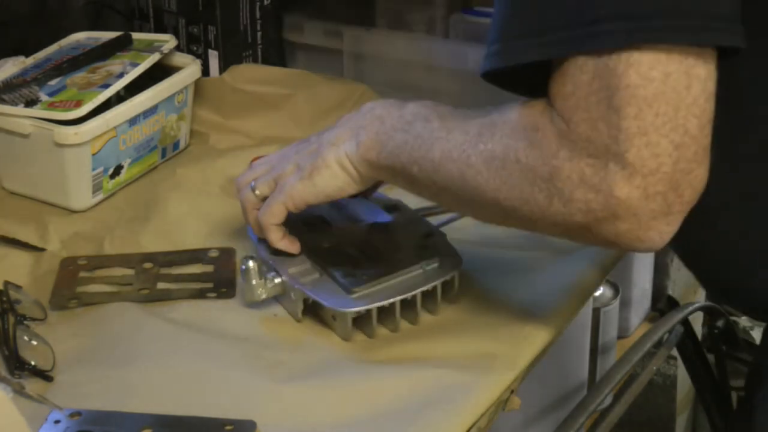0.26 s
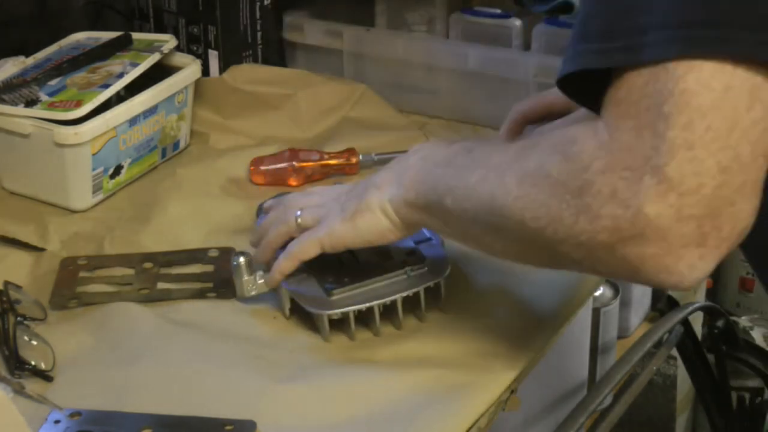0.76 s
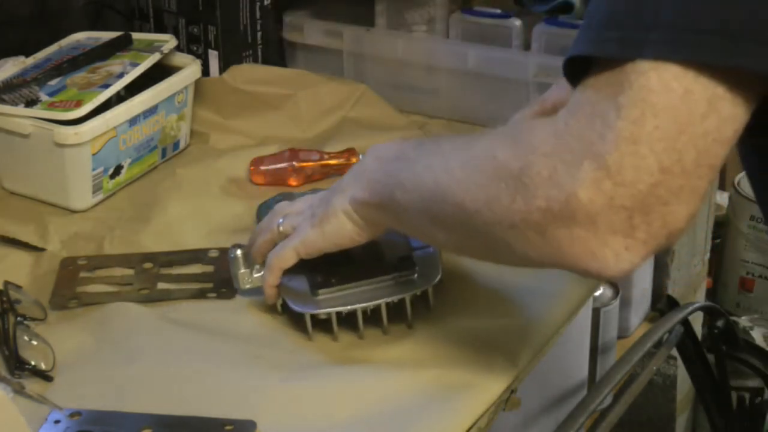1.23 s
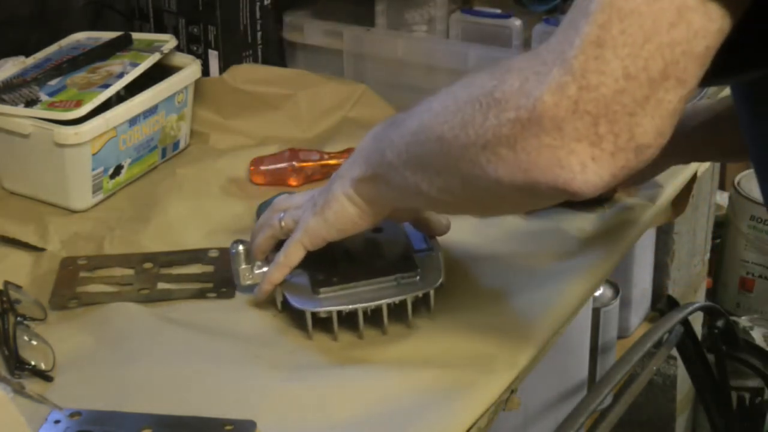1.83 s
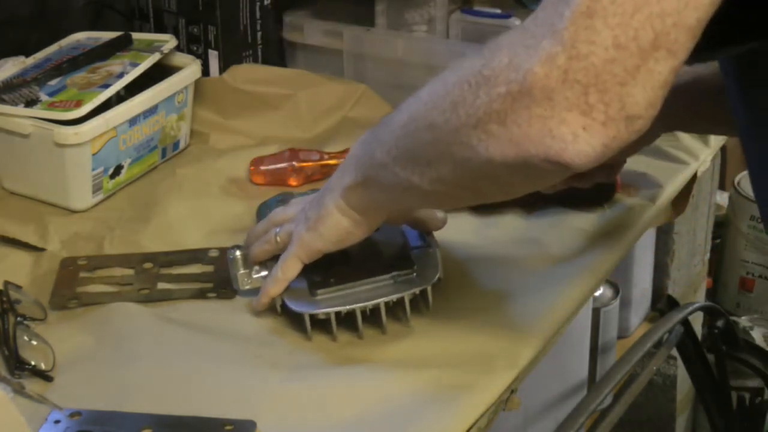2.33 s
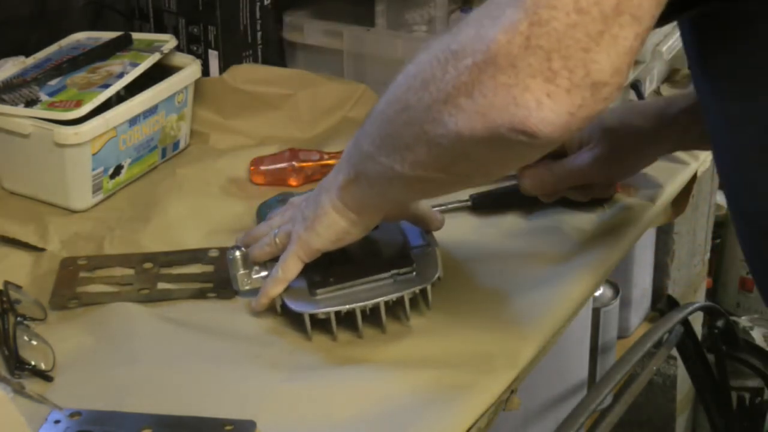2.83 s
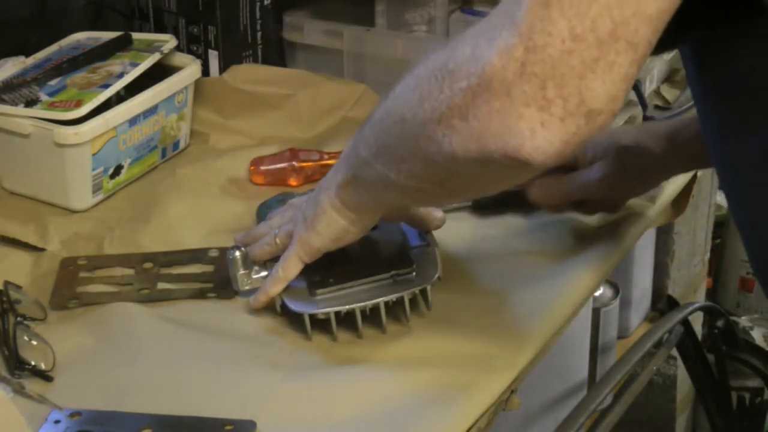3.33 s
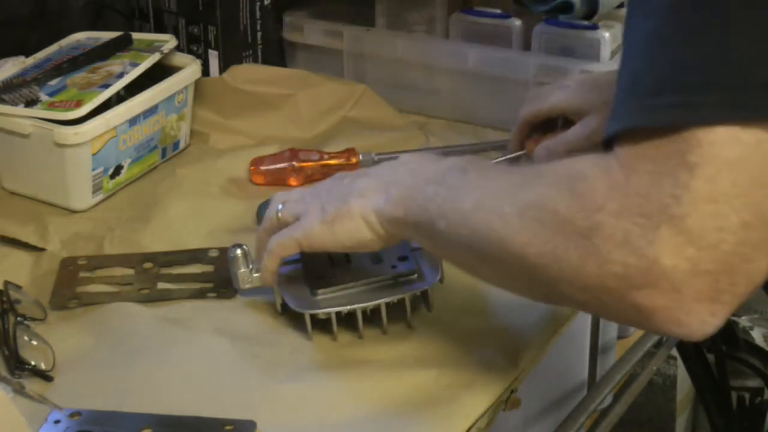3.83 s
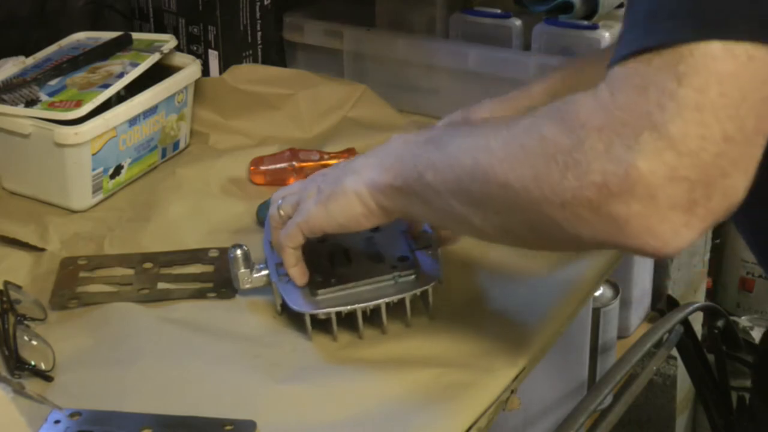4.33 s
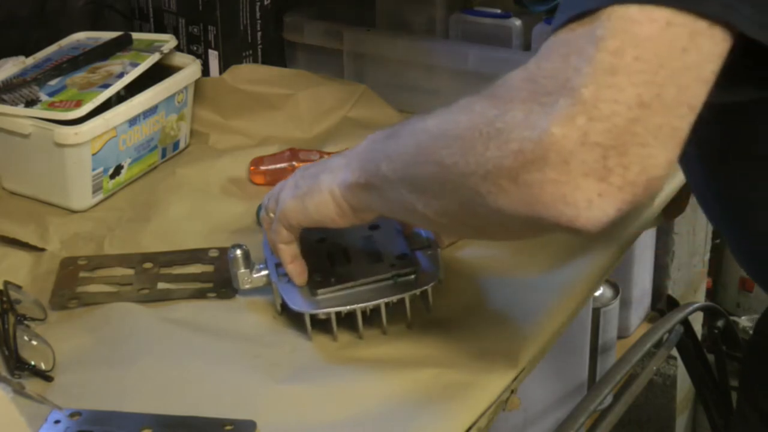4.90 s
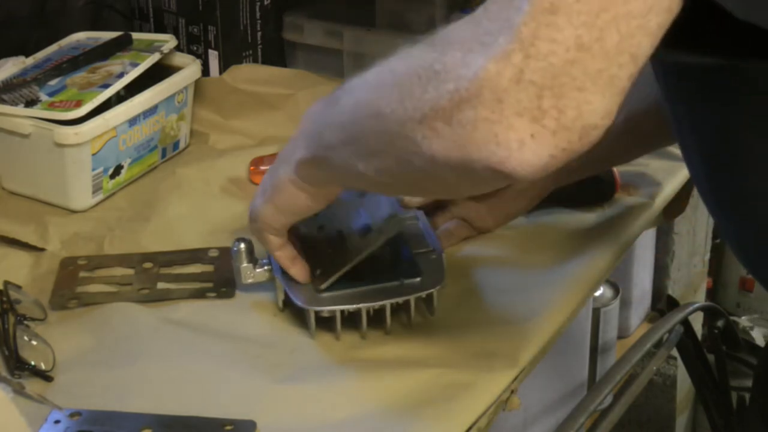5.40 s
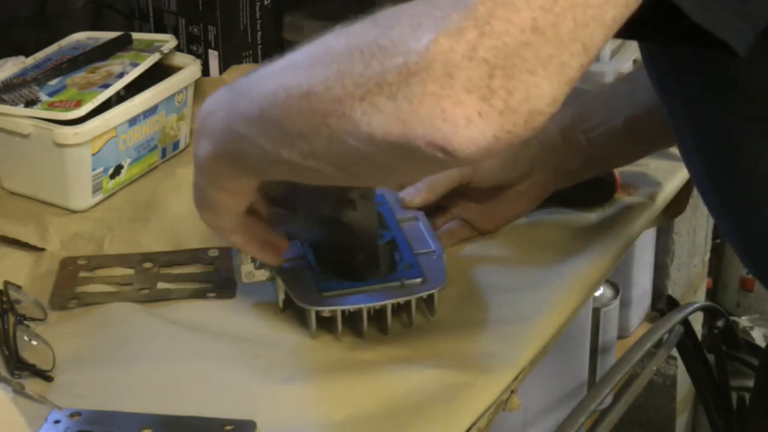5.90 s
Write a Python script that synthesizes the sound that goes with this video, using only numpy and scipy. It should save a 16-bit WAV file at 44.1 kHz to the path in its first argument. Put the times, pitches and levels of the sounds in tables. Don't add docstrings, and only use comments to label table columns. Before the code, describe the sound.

Close stereo sound in a small, dull-echoing workshop: busy rasping and bumping of cast metal on a bench, then a few small steel clinks and faint feeling ticks. A sudden loud metallic snap breaks the calm, followed by two weaker knocks, the last with a brief skid. Bright scratchy prying continues, ending with thin sheet-metal pings and soft bench bumps over low machine hum, high whine and hiss.

```python
import sys
import numpy as np
from scipy import signal
from scipy.fft import rfft, irfft
from scipy.io import wavfile

SR = 44100
rng = np.random.default_rng(int(sys.argv[2]) if len(sys.argv) > 2 else 0)


def to_wav(sig):
    pcm = np.clip(np.atleast_2d(sig), -1, 1) * 32767
    pcm = np.round(pcm).astype(np.int16)
    wavfile.write(sys.argv[1], SR, pcm.T)


def volts_from_db(level):
    exponent = np.asarray(level, float) / 20
    return 10 ** exponent


N = 271215
TIME = np.arange(N) / SR

# f/Hz, density/dB
AIR_SPECTRUM = [(15, -66), (25, -26), (92, 12.5), (223, -15), (293, -1), (695, 8), (796, 9.5), (887, -6),
                (1150, -0.5), (2410, 0), (10100, -23), (14800, -29), (16000, 1)]
# f/Hz, density/dB
AIR_SIDE_SPECTRUM = [(15, -60), (25, -53), (111, 3), (344, -1), (394, -0.5), (427, 2), (489, -7.5),
                     (840, -12.5), (911, -19.5), (14000, -33), (16000, -6.5)]
AIR_DB, AIR_SIDE_DB = -67.5, -54.5
HUM_HZ = [100, 301.5, 431, 866.5, 15627.3]
# centre level/dB, left-right difference level/dB, wander/Hz
HUM_LINES = [
    (-79, -84, 2.5),
    (-80.5, -70.5, 4.28),
    (-77, -67.5, 2.24),
    (-74.5, -80.5, 1.4),
    (-65, -88, .3),
]

# fastest t/s, rise/s, fall/s, rasp level/dB, edge above 7 kHz against the rasp/dB
STROKES = [(.07, 0.021, 0.17, -55.5, -1), (.29, 0.17, 0.14, -47.5, -5.5), (.58, 0.03, 0.13, -54, -12),
           (.76, 0.19, 0.47, -62, -7.5), (1.15, 0.081, 0.034, -47, -7.5), (1.24, 0.066, 0.049, -56, -14),
           (1.6, 0.16, 0.2, -70, -11), (3.24, 0.14, 0.18, -65.5, -10), (3.56, 0.062, 0.23, -70, -6),
           (3.92, 0.094, 0.12, -54.5, -7.5), (4.2, 0.4, 0.34, -61, -1.5), (4.62, 0.068, 0.13, -53, -9.5),
           (5.26, 0.043, 0.061, -52.5, -7), (5.8, 0.18, 0.093, -65, -4), (6.04, 0.022, 0.05, -65, -7)]
# heaviest t/s, rise/s, fall/s, bench rumble level/dB, hollow
# 450-820 Hz against the rumble/dB
LEANS = [
    (0.0, .1, 0.064, -59.5, -14),
    (.36, 0.33, 0.65, -63.5, 1.5),
    (1.12, 0.082, 0.097, -55.5, 13.5),
    (3.25, 0.11, 0.11, -62, 3),
    (3.8, 0.047, 0.29, -64.5, 10.5),
    (4.03, 0.065, 0.36, -64, -2),
    (4.6, 0.22, 0.22, -66.5, 12.5),
    (5.85, 0.14, 0.54, -64, -18),
]
IDLE_RASP_DB, IDLE_EDGE_DB, IDLE_BENCH_DB, IDLE_HOLLOW_DB = -72.5, -76, -69.5, -75.5
BELL_SHAPE = 1.82
# f/Hz, density/dB
RASP = [(590, -77), (1000, -9.5), (1270, -25), (1430, 0), (1600, -16), (1750, 0.5), (2670, 1), (6350, 1),
        (9000, -22.5), (11700, -53), (19800, -120)]

# start t/s, end t/s, first f/Hz, last f/Hz, level/dB, half width/Hz
RUBS = [(1.68, 1.95, 1850, 1880, -71.5, 12), (3.03, 3.115, 2310, 2120, -71, 44),
        (5.44, 5.553, 3500, 1900, -78, 30), (0.916, 0.975, 2380, 2130, -59.5, 90),
        (0.0, 0.036, 2900, 2200, -60, 200), (0.071, 0.13, 4500, 4100, -56, 200),
        (0.135, 0.18, 3950, 3400, -55, 230), (0.188, 0.26, 3900, 3900, -52, 250),
        (0.265, 0.34, 4300, 4900, -54, 250), (1.11, 1.167, 3500, 4200, -55, 200),
        (2.36, 2.42, 3900, 3850, -76, 30), (0.57, 0.61, 1700, 1500, -54.5, 250)]
STEADY_HZ = 15

# t/s, peak
# level/dB, centre f/Hz, share above 7 kHz/dB
CONTACTS = [(0.038, -39, 2490, -14), (0.0525, -47, 4400, -9), (0.459, -35, 3080, -32),
            (1.341, -45.5, 1730, -33), (1.364, -50, 1750, -35), (1.498, -49, 2456, -25),
            (0.0475, -27.5, 4430, -6.5), (0.2483, -38.5, 1780, -14), (0.4635, -32, 3900, -25),
            (0.6843, -44, 1970, -6), (0.7506, -43.5, 2410, -19), (0.7925, -41.5, 1840, -25),
            (0.942, -46.5, 2380, -4), (1.023, -31.5, 2800, -30), (1.096, -34.5, 1780, -15),
            (1.104, -40, 2400, -22), (1.1543, -35, 2700, -2.5), (1.2204, -38, 3140, -18),
            (1.278, -55, 6340, 13.5), (1.3074, -42.5, 3290, -0.5), (1.3166, -40, 4540, -18),
            (1.4571, -47, 2200, -23),
            (1.624, -44, 1060, -30), (3.225, -48, 3200, -25), (1.5834, -44.5, 4530, -21),
          (1.6154, -50, 2670, -28), (1.849, -45.5, 2220, -22), (1.8951, -45.5, 3370, -11),
          (1.9217, -48.5, 5470, -7), (2.231, -44, 2930, -40), (2.299, -44, 1900, -20),
          (2.316, -43, 2920, -25), (3.2964, -43, 2570, -12), (3.3534, -46.5, 3000, -9),
          (3.6298, -47, 2310, -30), (3.8192, -43, 2730, -19), (3.8857, -42, 5500, -18),
            (4.2817, -48, 2340, -14), (4.380, -46, 4000, -17), (4.496, -41, 2120, -14),
           (4.711, -40, 680, -35), (5.893, -40, 850, -42), (6.068, -56, 1400, -35), (6.078, -39, 2900, -28),
           (4.3327, -35.5, 4600, -21), (4.4387, -37.5, 2510, -7.5), (4.563, -28.5, 5310, -10.5),
           (4.5897, -30.5, 6160, -25), (4.64, -34.5, 3970, -7), (4.6617, -42, 4510, 1),
           (4.6937, -36.5, 4930, -3), (4.724, -36, 3020, -6.5), (4.9803, -35, 3400, -7),
           (5.0984, -44.5, 2590, -19), (5.237, -38, 2500, -29), (5.2628, -33, 2680, -14),
           (5.2661, -31, 3080, -13), (5.652, -40, 2240, -34), (5.7616, -40, 2100, -7),
           (5.888, -45, 2300, -20), (6.0626, -41, 2160, -44), (6.1464, -31, 4500, 4.5)]
# t/s, peak level/dB, centre f/Hz, share above 7 kHz/dB
SCUFFS = [(0.343, -30.5, 3420, -8.5), (0.5628, -36.5, 2140, -30), (0.6193, -43, 3070, 7),
          (0.945, -45.5, 3720, -20), (1.013, -42, 3500, -10), (2.003, -52.5, 3800, -8),
          (2.055, -51.5, 2600, -25), (2.081, -55, 2430, -25), (2.135, -72, 2320, -25),
          (2.271, -53, 4960, -2), (4.815, -54, 3800, -2), (4.905, -49.5, 5700, -8),
          (5.156, -41.5, 3730, -27), (5.217, -48, 3280, -13), (5.395, -55.5, 6500, 6),
          (5.428, -45, 2500, -5.5), (5.45, -53, 5000, -1), (5.52, -57.5, 4500, 3)]
TICK_T60_S, TICK_RISE_S, SCUFF_RISE_S, TICK_SNAP_DB = 0.086, 0.0016, 0.0077, 6.5

# t/s, peak level/dB, f/Hz
SNAPS = [(0.0489, -33, 4200), (0.0533, -34, 4460), (0.0595, -36, 5500), (0.251, -34, 3540),
         (0.268, -36, 4400), (0.293, -37, 3300), (0.3505, -36, 2900), (0.4647, -33, 4500),
         (0.6205, -48.5, 8950), (1.2204, -38, 3500), (1.3173, -39, 5000), (1.6177, -39, 2840),
         (1.6228, -42, 2210), (2.8063, -15, 2650), (2.8066, -14, 3400), (2.8068, -17, 5000),
         (2.8069, -21, 1300), (3.16, -29, 2600), (3.9595, -31, 6100), (3.9655, -24, 5900),
         (3.9687, -20, 4600), (3.9715, -16, 4350), (3.974, -24, 2600), (4.282, -43, 2520),
         (4.437, -45, 2970), (4.5639, -32, 6100), (4.6922, -34, 5000), (4.7235, -38, 4060),
         (4.9797, -36, 7500), (5.2658, -32, 3500), (6.0685, -28, 2300), (6.0775, -36, 3000)]
SNAP_CYCLES = 4.0

# t/s, peak level/dB, f/Hz
THUMPS = [(0.137, -46, 182), (0.218, -34.5, 202), (0.377, -42, 179), (0.537, -47, 230), (0.643, -43.5, 170),
          (0.689, -42, 210), (0.83, -42, 201), (0.937, -38.5, 194.5), (1.03, -41, 213),
          (1.168, -39.5, 165.5), (1.409, -55, 273), (2.298, -57, 299), (2.91, -53, 371), (2.81, -43, 200),
          (3.163, -38, 290), (3.248, -52, 440), (3.764, -49, 219), (3.833, -48, 219), (3.968, -34, 281.5),
          (4.387, -53, 187), (4.55, -49, 238), (4.707, -52, 385), (5.269, -53.5, 209), (5.592, -57, 222),
          (5.77, -46.5, 233), (5.896, -34.5, 222.2), (6.073, -38.5, 212)]
BENCH_T60_S = 0.12
THUD_DB, THUD_DB_PER_OCTAVE = -14, 12

# t/s, contact/s
CLINKS = [
    (1.022, 0.0022),
    (1.056, 0.0031),
    (1.092, 0.0032),
    (1.221, 0.0028),
    (1.617, 0.0019),
    (1.7075, 0.0023),
]
SHAFT_HZ = [1460, 1860, 2275, 2720, 2870, 2993, 3030, 4640, 4985, 5986, 4715, 5780]
# t60/s, then level/dB at each clink
SHAFT_MODES = [(0.057, -66, -80, -52, -49.5, -61, -49), (0.13, -44.5, -85, -70, -68, -58, -57),
               (0.1, -46, -68, -44, -65, -83, -84), (0.11, -43.5, -60, -70, -63, -78, -58),
               (0.065, -36, -54, -70, -70, -74, -68), (0.1, -39.5, -38.5, -70, -70, -80, -53),
               (0.062, -39, -53, -70, -70, -73, -38), (0.04, -62, -70, -70, -70, -80, -46),
               (0.057, -45, -64, -70, -70, -82, -55), (0.038, -55, -62, -70, -70, -83, -54),
               (0.1, -65, -70, -70, -70, -78, -57), (0.053, -65, -70, -70, -70, -80, -58)]

# t/s, snap level/dB, snap length/s, crack level/dB, crack t60/s, skid/s
KNOCKS = [
    (2.8074, -9, 0.00037, -26, 0.12, 0.0003),
    (3.1546, -32, 0.0025, -34, 0.14, 0.00056),
    (3.97, -28, 0.0043, -28, 0.16, 0.0078),
]
# f/Hz, density/dB
FIRST_CRACK = [(180, -7), (300, 1), (1000, -8.5), (1500, -30), (2700, -7.5), (5430, -10.5), (5800, -9.5),
               (16000, -25.5)]
SECOND_CRACK = [(150, -16), (300, -3.5), (379, -33), (737, -3.5), (1190, -24.5), (2700, -20.5), (3400, -15),
                (16000, -50)]
THIRD_CRACK = [(180, -5.5), (300, -0.5), (713, -9), (1100, -14.5), (1500, -14), (2600, -12.5), (4520, -9.5),
               (16000, -22)]
CRACKS = [FIRST_CRACK, SECOND_CRACK, THIRD_CRACK]
# t/s, contact/s
HEAD_BLOWS = [
    (2.8058, 0.00057),
    (2.8145, 0.0012),
    (3.1545, 0.0023),
    (3.966, 0.0028),
]
HEAD_HZ = [455, 605, 735, 791, 1042, 1860, 2600, 2730, 3025, 3400, 4170, 4670, 5700, 5910, 255, 3800, 4930,
           5440, 6510]
# t60/s, then level/dB at each blow
HEAD_MODES = [(0.41, -74, -54, -47.5, -47), (0.057, -36, -50, -48, -48), (0.086, -22.5, -32.5, -28.5, -30),
              (0.15, -37, -39, -50, -43), (0.04, -32, -62, -34, -36.5), (0.068, -37, -47, -40.5, -29.5),
              (0.023, -44, -57, -27.5, -20), (0.047, -41, -33, -36, -40), (0.04, -56, -44, -33.5, -37),
              (0.017, -34, -49, -53, -62), (0.04, -30, -54, -38, -30), (0.047, -25, -35, -39, -27),
              (0.091, -60, -27, -46, -31), (0.041, -45, -43, -62, -28), (0.23, -47, -55, -48, -55),
              (0.076, -45, -49, -44, -49), (0.091, -42, -48, -48, -42), (0.066, -34, -46, -48, -39),
              (0.081, -43, -48, -60, -34)]
BOUNCE_S, BOUNCE_CONTACT_S, BOUNCE_LOSS_DB = 3.232, 0.002, 18
BOUNCE_FIN_HZ, BOUNCE_FIN_GAIN_DB = 1900, 6

# t/s, contact/s
TOUCHES = [
    (5.7615, 0.0011),
    (5.826, 0.0013),
    (5.890, 0.0025),
    (6.0645, 0.0022),
    (6.1463, 0.00082),
]
PLATE_HZ = [430, 600, 810, 1036, 1445, 1950, 2040, 2205, 2993, 4140, 4520, 5530, 5930, 6043, 6770, 6920,
            8133, 8730, 10820, 301, 960, 1100, 1600, 1820, 2320, 3047, 3505, 1710, 2466, 2869, 3990]
# t60/s, then level/dB at each touch
PLATE_MODES = [(0.13, -64, -85, -44, -44.5, -67), (0.048, -61, -83, -40, -48.5, -63),
               (0.038, -47.5, -81, -51, -48, -68), (0.067, -62, -80, -43, -42, -75),
               (0.045, -68, -80, -44.5, -41, -68), (0.17, -75, -67, -47, -37.5, -52),
               (0.033, -72, -75, -56, -30.5, -50), (0.36, -62, -75, -56, -62, -64),
               (0.085, -69, -72, -62, -44.5, -52), (0.077, -58, -70, -58, -50, -50),
               (0.096, -55, -59, -54.5, -59, -57), (0.14, -70, -60, -75, -53, -53),
               (0.27, -57.5, -67, -53.5, -61, -45), (0.05, -75, -80, -72, -43, -50),
               (0.14, -52, -79, -56, -60, -38), (0.15, -53, -80, -72, -54, -51),
               (0.25, -54, -74, -70, -56, -39), (0.17, -64, -80, -63, -77, -55),
               (0.17, -61, -82, -65, -68, -59), (0.16, -52, -76, -39.5, -47, -70),
               (0.045, -58, -82, -68, -70, -70), (0.084, -76, -80, -69, -69, -70),
               (0.067, -70, -78, -48, -60, -70), (0.036, -66, -80, -39, -49, -65),
               (0.055, -70, -75, -66, -44, -63), (0.082, -70, -75, -56, -43, -55),
               (0.2, -72, -84, -81, -70, -51), (0.045, -75, -80, -74, -41.5, -65),
               (0.063, -75, -80, -70, -51, -63), (.2, -75, -82, -75, -57, -48),
               (.05, -75, -80, -75, -65, -37.5)]
HEAD_BEAT_DB, SHAFT_BEAT_DB, PLATE_BEAT_DB = 1.5, 2.5, 1.5

ROOM_T60_S, ROOM_DB, WALL_CUT_HZ = 0.27, -12, 6500
RING_ECHO_DB = -5
TOP_HZ = 17100


def rms_one(x):
    return x / np.sqrt(np.mean(x ** 2) + 1e-20)


def fade(t, t60):
    return volts_from_db(-60 * t / max(t60, .005))


def coloured(x, spectrum):
    hz, db = np.transpose(spectrum)
    axis = np.maximum(np.fft.rfftfreq(x.shape[-1], 1 / SR), 1)
    gain = volts_from_db(np.interp(np.log(axis), np.log(hz), db))
    return rms_one(irfft(rfft(x) * gain, x.shape[-1]))


def passed(x, hz, kind, order=2):
    sos = signal.butter(order, np.clip(hz, 10, .45 * SR), kind, fs=SR, output="sos")
    return signal.sosfilt(sos, x)


def band_noise(x, low_hz, high_hz, order=2):
    return rms_one(passed(x, [low_hz, high_hz], "band", order))


def drift(rate_hz):
    return rms_one(passed(rng.standard_normal(N + SR), rate_hz, "low")[SR:])


def ring(force, hz, t60):
    r, w = fade(1 / SR, t60), 2 * np.pi * hz / SR
    return signal.lfilter([0, np.sin(w)], [1, -2 * r * np.cos(w), r * r], force + 1e-18)


def add(out, s, piece):
    at = round(s * SR)
    out[at:at + len(piece)] += piece[:N - at]


def grit(per_s, spread_db):
    sizes = volts_from_db(spread_db * np.minimum(rng.exponential(1, N), 4))
    sizes = sizes * rng.choice([-1, 1], N)
    return rms_one(sizes * (rng.random(N) < per_s / SR))


def swells(rows, idle_db, idle_other_db):
    t = TIME[::64]
    main, other = volts_from_db(2 * idle_db), volts_from_db(2 * idle_other_db)
    for s, rise, fall, db, other_db in rows:
        distance = np.abs((t - s) / np.where(t < s, rise, fall))
        power = volts_from_db(2 * db) * np.exp(-2 * distance ** BELL_SHAPE)
        main = main + power
        other = other + power * volts_from_db(2 * other_db)
    return np.interp(TIME, t, 10 * np.log10(main)), np.interp(TIME, t, 10 * np.log10(other))


def struck(blows, pitches, modes, beat_db):
    out, t = np.zeros(N), TIME[:2000]
    waver = drift(130)
    roughness = np.abs(rng.standard_normal((len(pitches), len(blows), len(t))))
    for hz, (t60, *levels_db), rough_pushes in zip(pitches, modes, roughness):
        force = np.zeros(N)
        for (s, contact_s), db, rough in zip(blows, levels_db, rough_pushes):
            push = rough * np.exp(-t / max(contact_s, .0002))
            felt = 2 * push / push.sum() * np.cos(2 * np.pi * hz * t)
            add(force, s, felt * volts_from_db(db))
        beating = volts_from_db(beat_db * np.roll(waver, 97 * round(hz)))
        out += ring(force, hz, t60) * beating
    return out


def background():
    mid = volts_from_db(AIR_DB + .5 * drift(3)) * coloured(rng.standard_normal(N), AIR_SPECTRUM)
    side = volts_from_db(AIR_SIDE_DB) * coloured(rng.standard_normal(N), AIR_SIDE_SPECTRUM)
    for hz, (mid_db, side_db, wander_hz) in zip(HUM_HZ, HUM_LINES):
        phase = 2 * np.pi * np.cumsum(hz + wander_hz * drift(5.5)) / SR
        sway_db = 2.0 * min(wander_hz, 1) * drift(7.4)
        mid = mid + np.sqrt(2) * volts_from_db(mid_db + sway_db) * np.sin(phase)
        side = side + np.sqrt(2) * volts_from_db(side_db) * np.cos(phase)
    return mid, side


def drag():
    rasp_db, edge_db = swells(STROKES, IDLE_RASP_DB, IDLE_EDGE_DB)
    bench_db, hollow_db = swells(LEANS, IDLE_BENCH_DB, IDLE_HOLLOW_DB)
    stutter_db = 2.0 * drift(27.0)
    grains = grit(3000, spread_db=1.5)
    grip_db = 5.0 * drift(20.0)
    fins = np.zeros(N)
    for hz in HEAD_HZ:
        if hz > 2500:
            fins += ring(grains, hz, t60=0.013) * volts_from_db(np.roll(grip_db, 61 * round(hz)))
    rasp = volts_from_db(rasp_db + stutter_db) * (coloured(grains, RASP) + volts_from_db(-10) * rms_one(fins))
    bright = passed(passed(grains, [7000, 15500], "band"), 8100, "low", order=1)
    edge = volts_from_db(edge_db + 0.067 * stutter_db + 0.2 * drift(51)) * rms_one(bright)
    hollow = volts_from_db(hollow_db - 14.0 + stutter_db) * band_noise(rng.standard_normal(N), 450, 820)
    bench = band_noise(rng.standard_normal(N), 140, 380)
    legs = volts_from_db(-18.0) * band_noise(rng.standard_normal(N), 30, 80)
    rumble = volts_from_db(bench_db + 3.2 * drift(19.0)) * (bench + legs)
    return rasp + edge + hollow, rumble


def rubs():
    out, white = np.zeros(N), rng.standard_normal(N + SR)
    for start, end, first_hz, last_hz, db, width_hz in RUBS:
        t, at = TIME[:round((end - start) * SR)], round(start * SR)
        both = np.array([white[at:], white[::-1][at:]])[:, :len(t) + SR // 4]
        even, odd = rms_one(passed(both, width_hz, "low")[:, SR // 4:])
        phase = 2 * np.pi * np.cumsum(np.linspace(first_hz, last_hz, len(t))) / SR
        song = (even + STEADY_HZ / width_hz) * np.cos(phase) + odd * np.sin(phase)
        add(out, start, volts_from_db(db) * np.sqrt(np.sin(np.pi * t / (end - start))) * song)
    return out


def ticks():
    out, t = np.zeros(N), TIME[:6000]
    hard = CONTACTS
    rows = hard + SCUFFS
    whites = rng.standard_normal((len(rows), 2, len(t)))
    dying = fade(t, TICK_T60_S)
    for k, ((s, db, hz, top_db), white) in enumerate(zip(rows, whites)):
        if k < len(hard):
            snap = volts_from_db(top_db / 5 + TICK_SNAP_DB) * np.exp(-t / 0.00072)
            shape = dying * (1 - np.exp(-t / TICK_RISE_S)) + snap
        else:
            shape = 2 * dying * (1 - np.exp(-t / SCUFF_RISE_S))
        broad = band_noise(white[0], 1500, 7000)
        body = band_noise(white[0], hz / 1.264, hz * 1.153, order=1)
        reach_hz = np.clip(12500 + 300 * top_db, 8000, 15500)
        top = volts_from_db(top_db) * fade(t, 2 * TICK_T60_S) * band_noise(white[1], 6500, reach_hz)
        add(out, s - .0005, volts_from_db(db - 10.0) * shape * (0.33 * broad + 0.79 * body + top))
    return out


def snaps():
    out, click = np.zeros(N), np.eye(1, 400)[0]
    for s, db, hz in SNAPS:
        add(out, s, volts_from_db(db - 0.5) * ring(click, hz, SNAP_CYCLES / hz))
    return out


def thumps():
    out, t = np.zeros(N), TIME[:12000]
    for (s, db, hz), white in zip(THUMPS, rng.standard_normal((len(THUMPS), len(t)))):
        shape = fade(t, BENCH_T60_S) * (1 - np.exp(-t / 0.0058)) ** 2
        turn = 2 * np.pi * hz * t
        tone = np.sin(turn) + 0.34 * np.sin(1.43 * turn) + 0.7 * np.sin(0.724 * turn)
        thud = rms_one(passed(passed(white, [110, 1500], "band"), 80, "low", order=1))
        thud *= volts_from_db(THUD_DB + THUD_DB_PER_OCTAVE * np.log2(hz / 200))
        thud *= fade(t, 1.75 * BENCH_T60_S) * (1 - np.exp(-t / 0.007))
        add(out, s - .004, volts_from_db(db + 2.5) * (shape * tone + thud))
    return out


def shaft():
    return struck(CLINKS, SHAFT_HZ, SHAFT_MODES, SHAFT_BEAT_DB)


def knocks():
    lead = .04
    out, t = np.zeros(N), TIME[:16000] - lead
    after = np.maximum(t, 0)
    whites = rng.standard_normal((len(KNOCKS), len(t)))
    for (s, db, length, crack_db, t60, skid_s), white, crack in zip(KNOCKS, whites, CRACKS):
        noise = coloured(white, crack)
        snap = volts_from_db(db - 0.5) * np.exp(-(after / length) ** 2)
        snap = snap * passed(noise, 1180, "high")
        tail = volts_from_db(crack_db) * fade(after, t60) * noise
        add(out, s - lead, np.exp(np.minimum(t, 0) / skid_s) * (snap + tail))
    modes = []
    for hz, row in zip(HEAD_HZ, HEAD_MODES):
        fin_db = BOUNCE_FIN_GAIN_DB * np.exp(-np.log2(hz / BOUNCE_FIN_HZ) ** 2)
        modes.append((*row, row[-2] - BOUNCE_LOSS_DB + fin_db))
    blows = HEAD_BLOWS + [(BOUNCE_S, BOUNCE_CONTACT_S)]
    return out, struck(blows, HEAD_HZ, modes, HEAD_BEAT_DB)


def plate():
    return struck(TOUCHES, PLATE_HZ, PLATE_MODES, PLATE_BEAT_DB)


def workshop(x):
    t = TIME[:SR // 2]
    tails = passed(rng.standard_normal((2, len(t))), WALL_CUT_HZ, "low", order=1)
    tails = tails * fade(t, ROOM_T60_S) * (t > .003)
    tails /= np.sqrt(np.sum(tails ** 2, axis=1, keepdims=True))
    return volts_from_db(ROOM_DB) * signal.fftconvolve(x[None], tails, axes=1)[:, :N]


def scene():
    cracks, rings = passed(np.array(knocks()), 167, "high")
    blows = cracks + rings
    rasp, rumble = drag()
    metal = rasp + ticks() + snaps() + blows + shaft() + plate() + rubs()
    bench = rumble + passed(thumps(), 103, "high", order=3)
    echo_mid, echo_side = workshop(metal + bench - (1 - volts_from_db(RING_ECHO_DB)) * rings)
    air_mid, air_side = background()
    wide = volts_from_db(2.5) * passed(passed(echo_side, 1560, "low", order=1), 250, "high", order=1)
    late = np.roll(passed(metal, 11600, "high"), SR // 2000)
    leaning = volts_from_db(-15.5) * passed(metal, 1500, "low", order=1) + volts_from_db(-6.0) * late
    jolt = volts_from_db(5.0) * passed(blows ** 2, 260, "low", order=1)
    mid = metal + bench + echo_mid + air_mid
    side = wide + leaning + jolt + air_side
    return np.array([mid + side, mid - side])


def band_limit(x):
    return signal.sosfilt(signal.butter(12, 17130, fs=SR, output="sos"), x)


def record(dry):
    top_cut = signal.cheby2(10, 60, TOP_HZ, fs=SR, output="sos")
    mix = signal.sosfilt(top_cut, passed(dry, 36, "high", order=1))
    return band_limit(mix)


dry = scene()
out = record(dry)
to_wav(out)
```